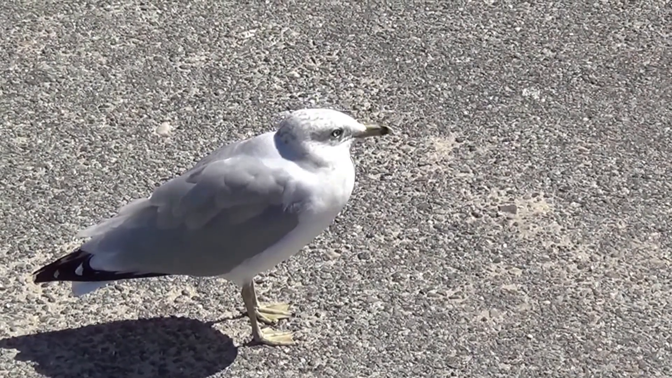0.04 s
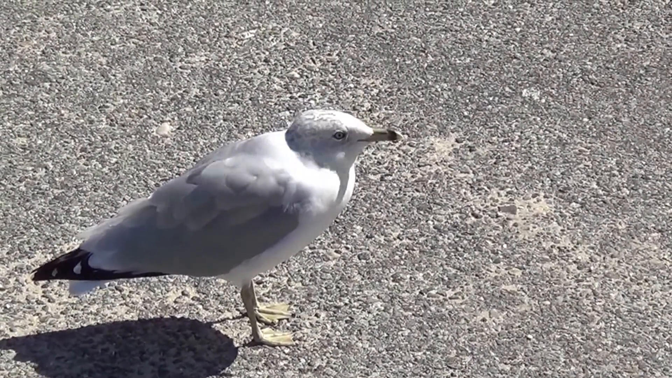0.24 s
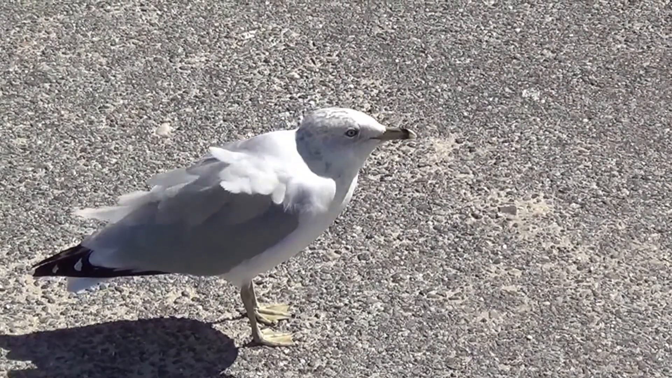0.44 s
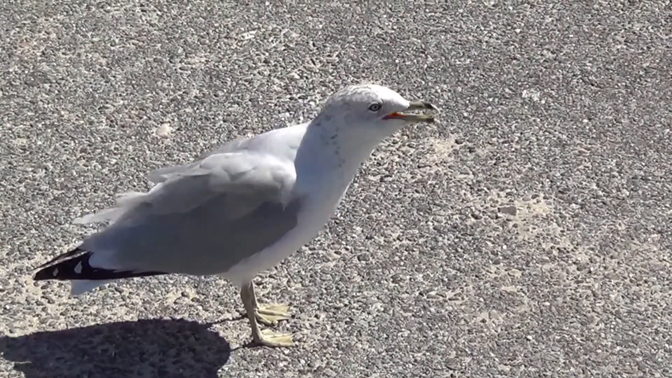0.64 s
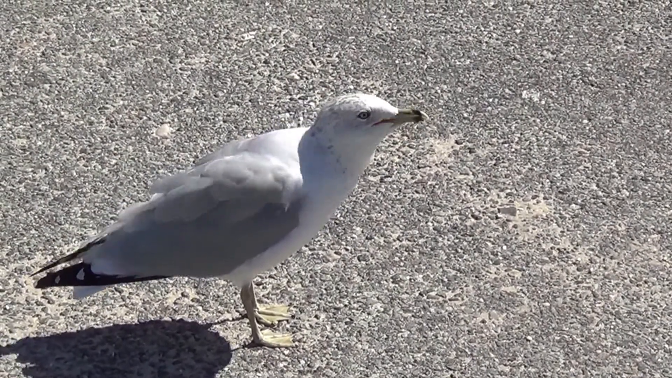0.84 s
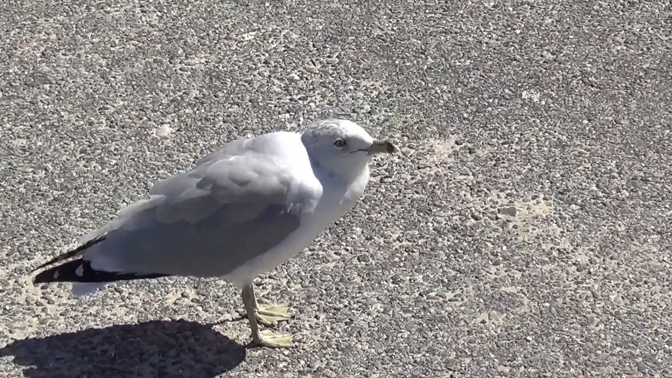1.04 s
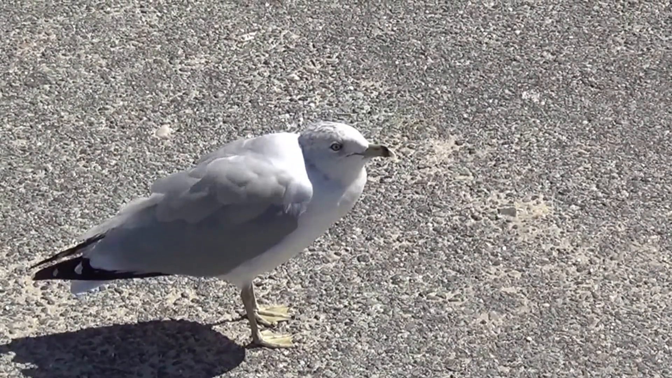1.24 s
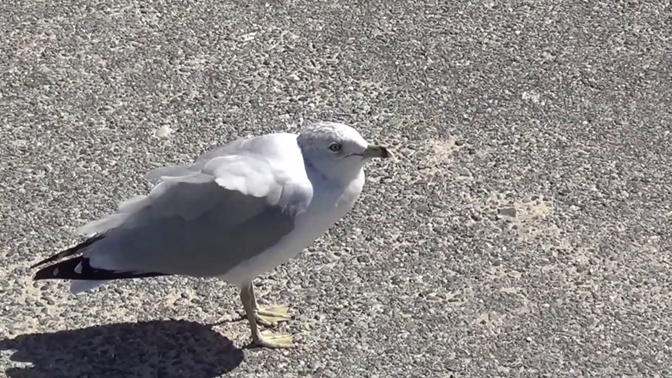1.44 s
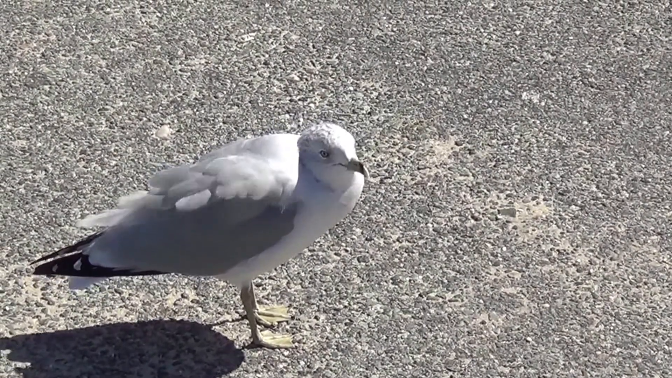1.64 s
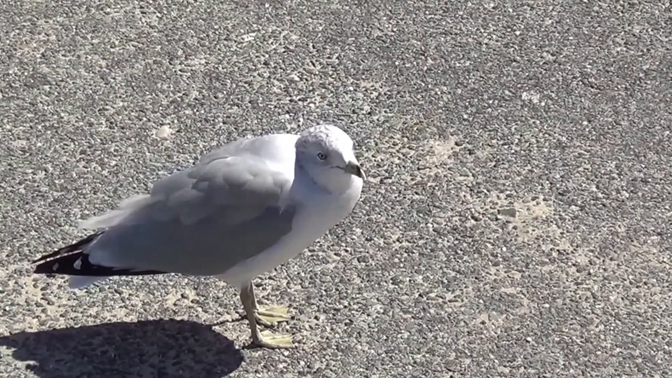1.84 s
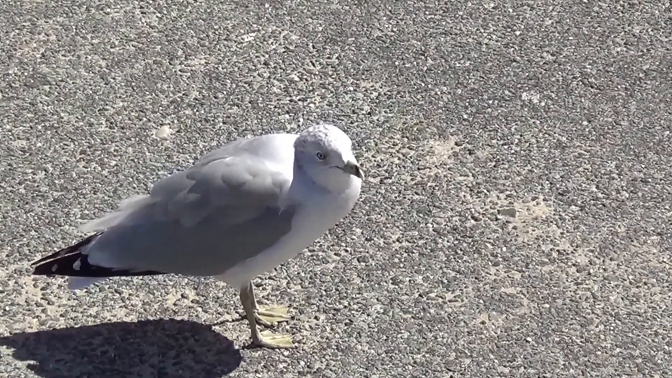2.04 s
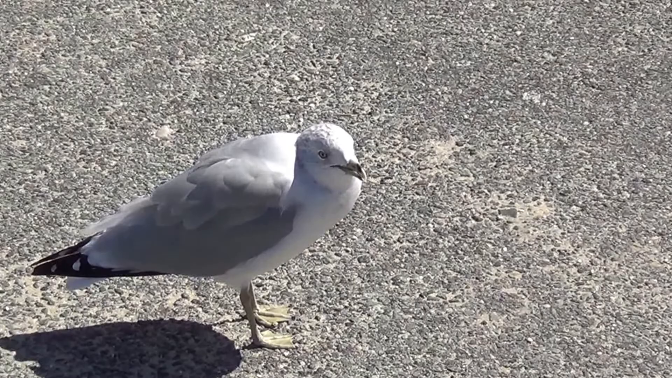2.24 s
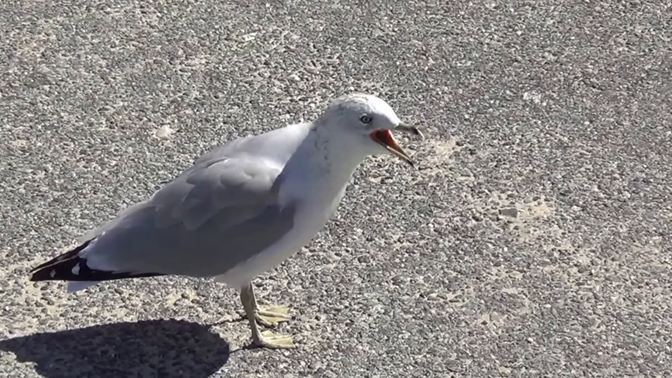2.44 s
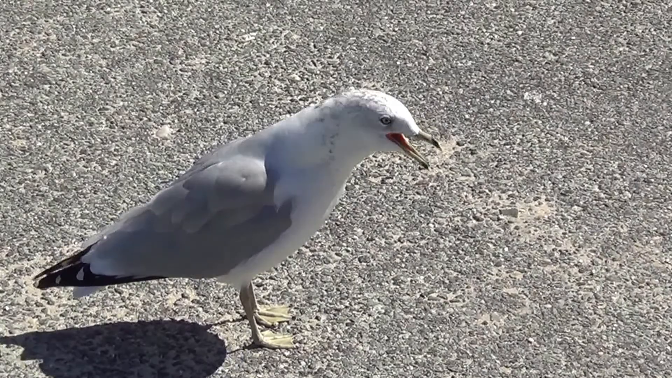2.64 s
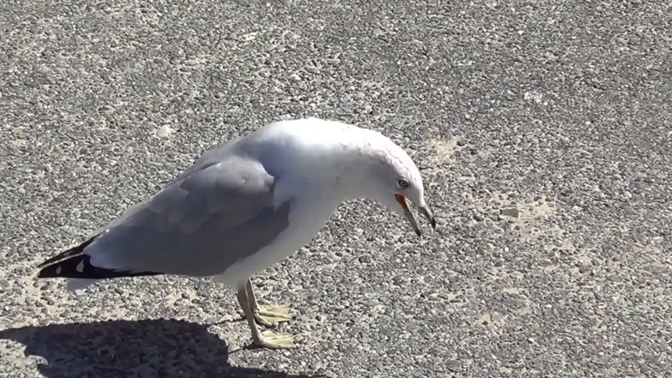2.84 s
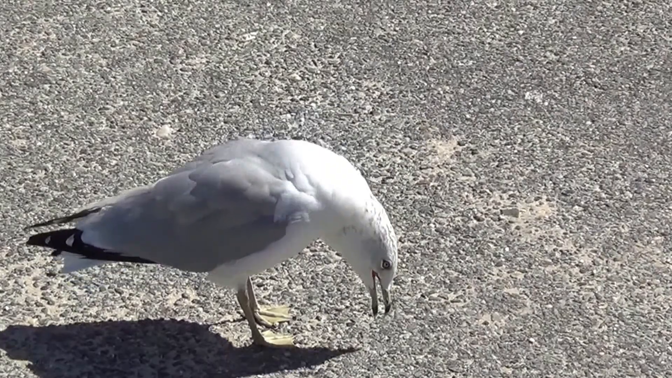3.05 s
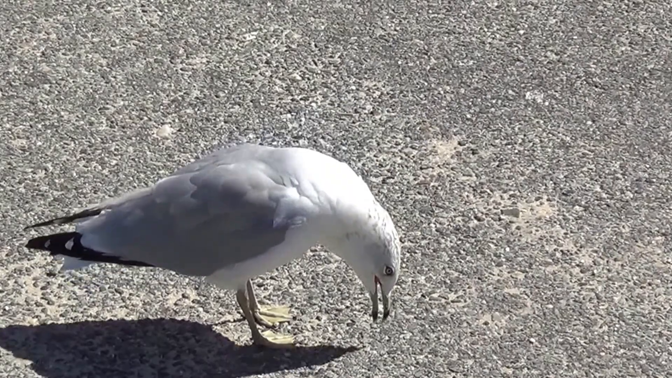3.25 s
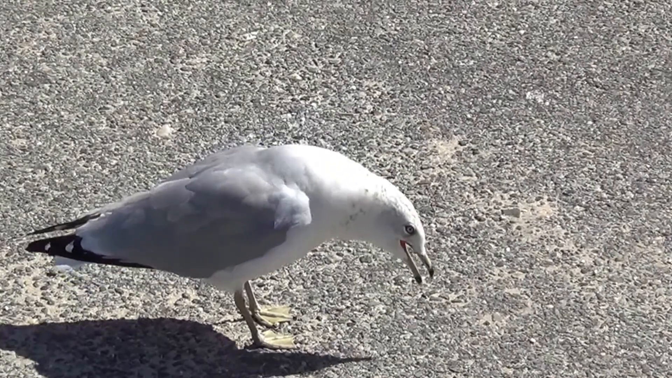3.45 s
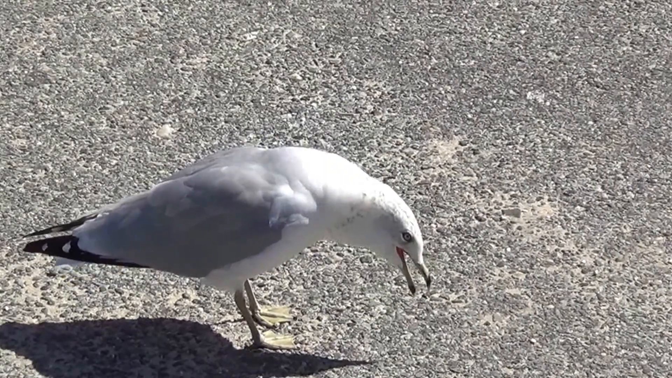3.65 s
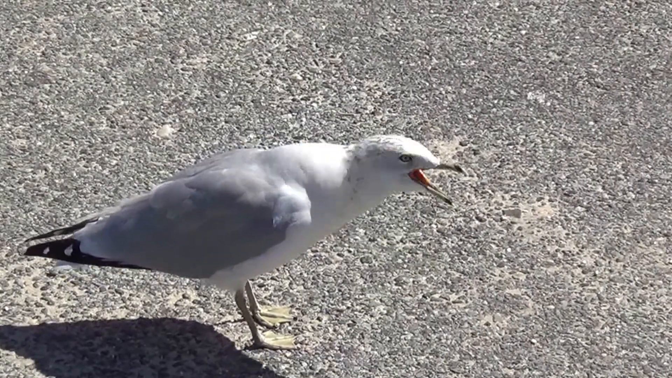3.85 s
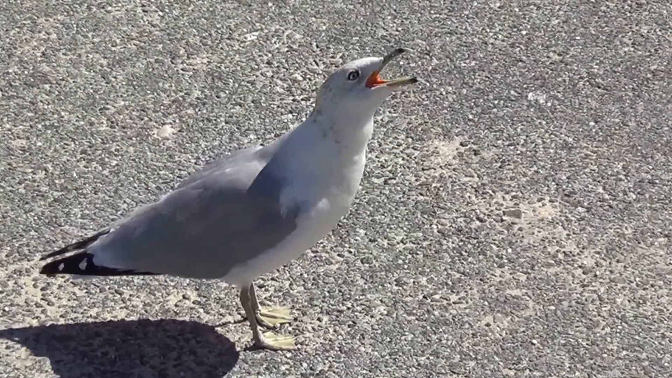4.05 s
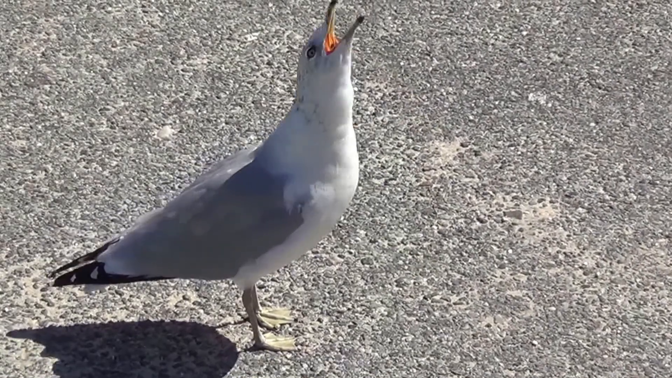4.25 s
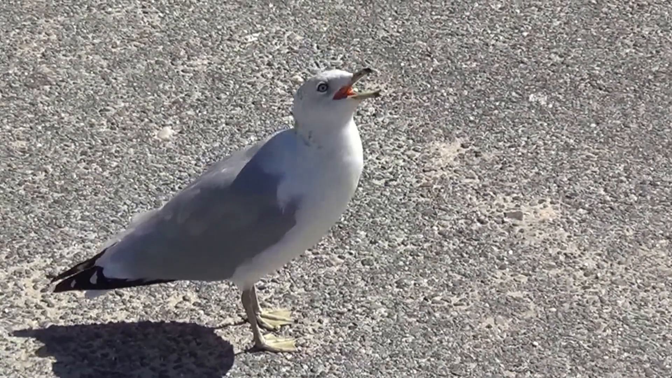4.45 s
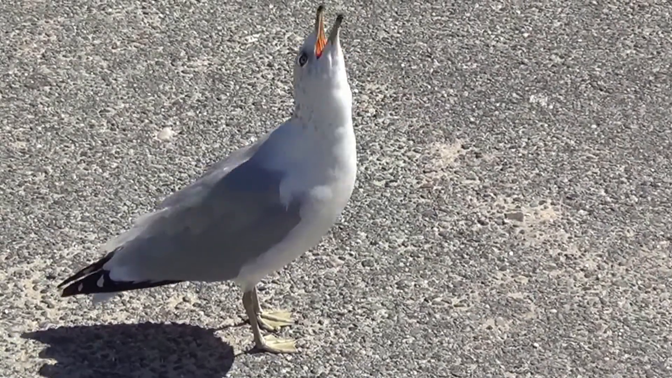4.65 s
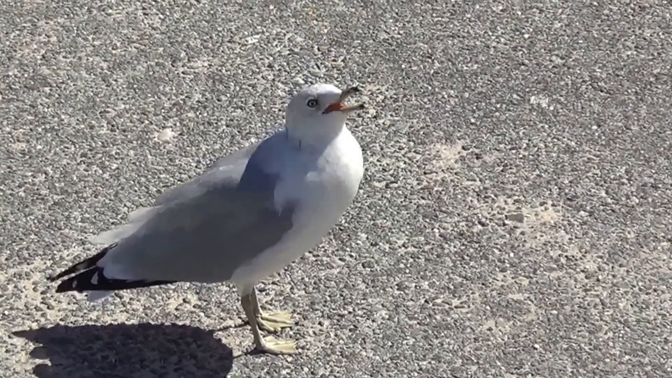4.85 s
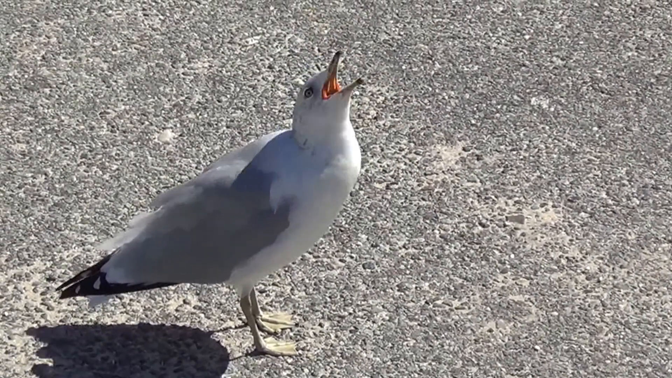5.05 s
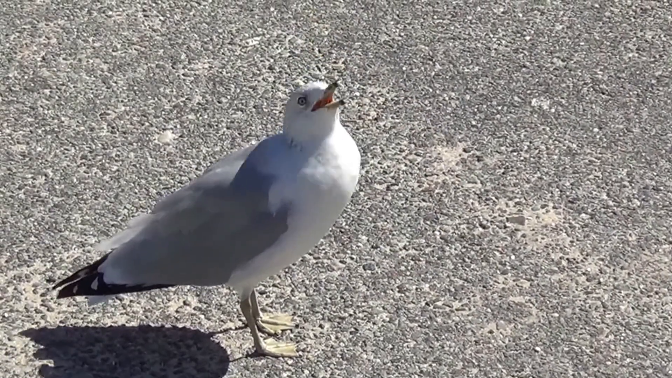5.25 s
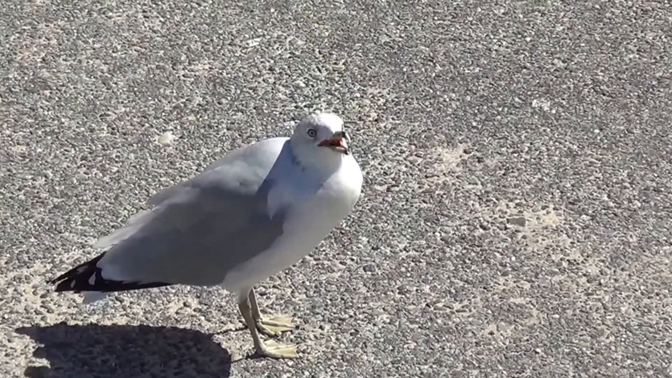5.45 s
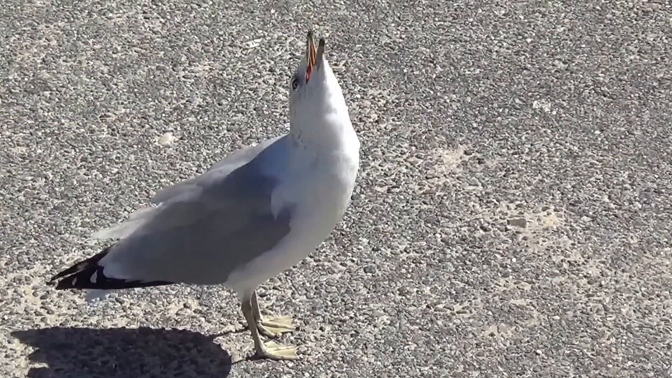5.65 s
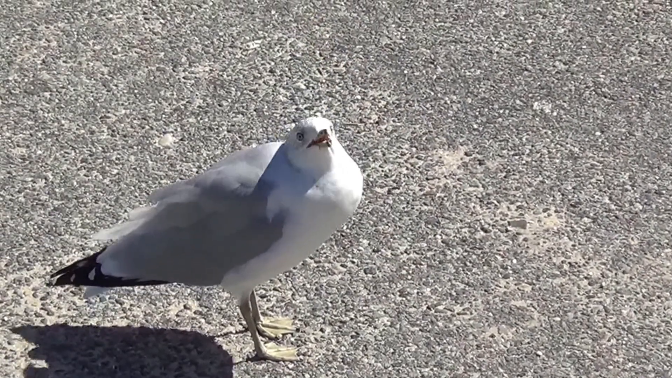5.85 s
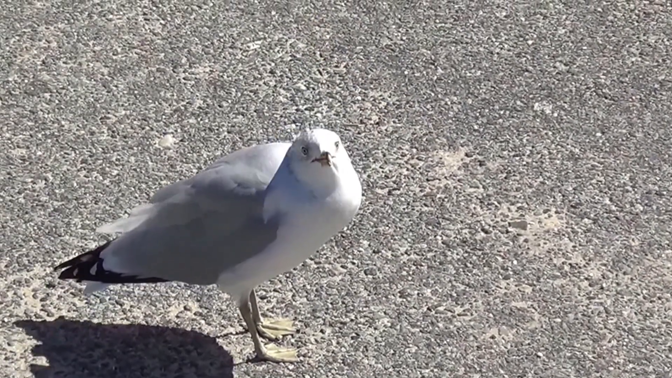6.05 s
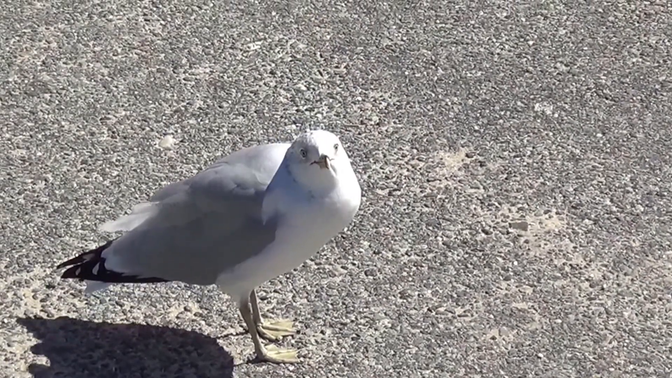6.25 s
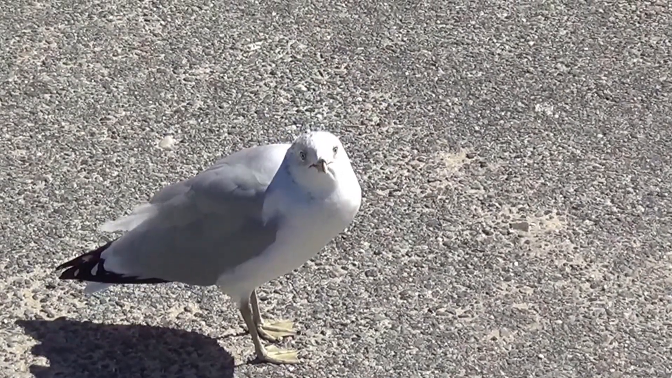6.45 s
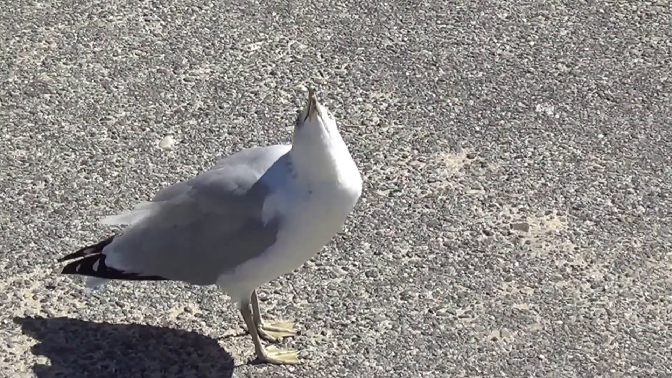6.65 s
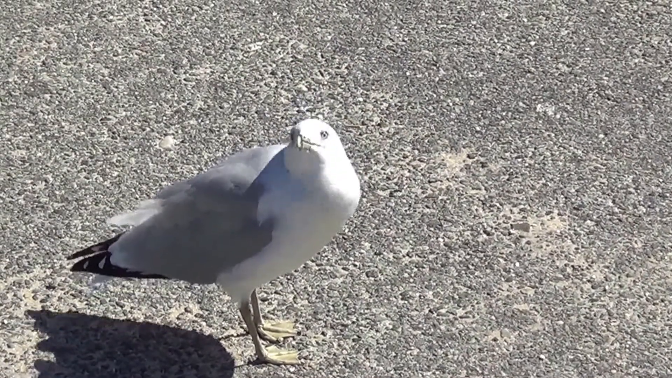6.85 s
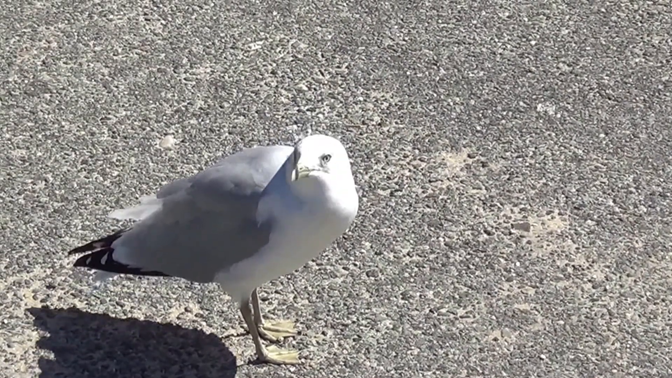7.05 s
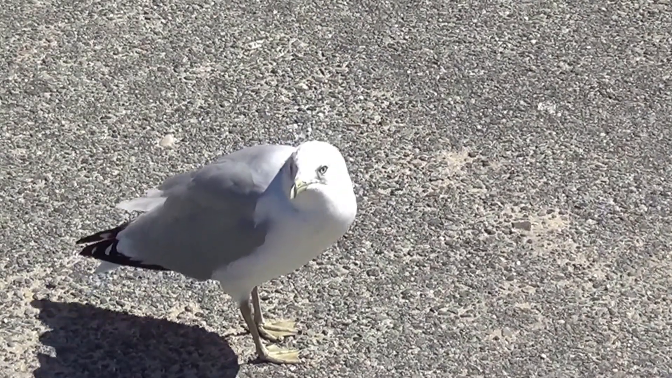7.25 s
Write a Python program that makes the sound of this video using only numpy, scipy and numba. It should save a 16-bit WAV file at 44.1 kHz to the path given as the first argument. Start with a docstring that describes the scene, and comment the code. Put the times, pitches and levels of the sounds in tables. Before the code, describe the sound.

Loud, harsh gull cries ring out up close, spaced at first and then in rapid succession, with soft wind touching the microphone.

```python
"""Gull on asphalt by the water

Ten loud cries on open asphalt, a metre or two from a stereo microphone pair. Each breaks in as a rasp,
a slow flutter throbbing the fast swing of the syrinx, locks into a clear tone that may jump in pitch or
double its period, and mostly breaks up again. Faint echoes follow. Behind the bird lie a distant outdoor
rush and one soft, low hum; puffs of wind touch the microphones."""
import sys
import numpy as np
from scipy import signal
from scipy.fft import rfft, irfft, next_fast_len
from scipy.io import wavfile
from scipy.ndimage import uniform_filter1d, minimum_filter1d, map_coordinates
from numba import njit

SR = 44100
rng = np.random.default_rng(int(sys.argv[2]) if len(sys.argv) > 2 else 0)


def wav_out(sig):
    """Save sig, one row per channel (or a flat mono array), as 16-bit PCM at SR to the path in sys.argv[1]."""
    wavfile.write(sys.argv[1], SR, np.round(np.clip(np.atleast_2d(sig).T, -1, 1) * 32767).astype(np.int16))


N = 322371

# colour of the distant rush: frequency_hz, gain_db
RUSH_COLOUR = [(25, -23), (45, -6), (85, 0), (170, -2.5), (330, -2.5), (1000, -6.5), (1700, -14.5),
               (3000, -17.5), (7000, -23.5), (15500, -25.5)]
# puffs of wind on the microphones: peak_s, level_db, half_width_s
WIND_PUFFS = [(0.042, -34, 0.025), (0.1, -44.5, 0.13), (1.074, -43, 0.023), (1.751, -56, .2),
              (2.027, -51.5, 0.045), (2.32, -52.5, 0.1), (2.628, -52.5, .03), (5.999, -55, 0.027),
              (7.25, -54.5, .03)]
# colour of the wind: frequency_hz, gain_db
WIND_COLOUR = [(25, -21.5), (70, -3), (170, 0), (330, -7), (700, -27.5), (3000, -46)]

# The gull's levels are set before the gain that gull() gives each layer.
# thin squeaks ahead of the first two cries, one list each: time_s, pitch_hz, second_harmonic_db
SQUEAK_CURVES = [
    [(.04, 4120, -54), (.065, 3800, -47), (.1, 3600, -60)],
    [(.1, 4350, -50), (.16, 4450, -66), (.22, 4950, -59), (.29, 4830, -65.5)],
    [(2.275, 4100, -60.5), (2.305, 3830, -44), (2.35, 3560, -62)],
]
# the croak that opens each cry:
# start_s, length_s, first_flutter_hz, last_flutter_hz, disorder (0-1), throat_hz, throat_db, beak_db
OPENING_CROAKS = [ (0.579, .026, 489.3, 600.5, .15, 1800, -15.5, -28.5),
                  (2.373, .021, 458, 540.4, .16, 1750, -22.5, -30),
                  (3.038, .027, 398.8, 425, .15, 1900, -21, -28),
                  (3.568, .034, 406, 452.7, .12, 2320, -17.5, -25.5),
                  (3.918, .073, 356.8, 375, .035, 1720, -12, -22.5),
                  (4.249, .128, 363.6, 397, .045, 1970, -11.5, -22),
                  (4.645, 0.067, 426, 370.6, .06, 2000, -11.5, -22),
                  (5.073, 0.057, 474.7, 394, .05, 2150, -13.5, -19),
                  (5.591, .014, 412, 427, .2, 2200, -18, -34.5),
                  (6.609, .028, 389.6, 500, .2, 2000, -25.5, -37), ]
# broad colour of the rasp from the throat: frequency_hz, gain_db
THROAT_COLOUR = [(100, -52.5), (350, -17.5), (800, -32.5), (1120, 1.5), (1450, 3), (2800, -0.5), (3300, -6),
                 (5000, -46.5)]
# broad colour of the rasp from the open beak: frequency_hz, gain_db
BEAK_COLOUR = [(300, -64), (2400, -21.5), (3300, -2), (3900, -0.5), (4900, -3), (5900, -4.5), (7200, -10),
               (10500, -10.5), (14000, -18.5), (16000, -25.5)]
# beak resonances, which move with the throat's and rise with gape: throat_multiple, width_hz, gain_db
BEAK_MODES = [(2.2, 744, -1), (4.4, 1600, -7)]
# colour of the knock of air as the throat opens: frequency_hz, gain_db
KNOCK_COLOUR = [(150, -27.5), (350, -3), (600, -2), (900, 8), (1500, -22.5), (4000, -45)]
# spells of faster flutter within a cry; columns as for the croaks
SQUEAL_SPELLS = [ (.612, .035, 1204, 1115, 0.068, 2000, -22.5, -25),
                 (2.402, .055, 987.5, 915, 0.067, 2364, -19, -21),
                 (2.464, 0.028, 525.3, 522, 0.034, 1782, -16.5, -18),
                 (3.141, 0.0074, 712, 715, 0.082, 2176, -28.5, -40.5),
                 (3.674, .005, 705, 705, 0.078, 2400, -30.5, -37.5),
                 (4.381, .01, 663, 645, .03, 2350, -23, -26.5),
                 (4.411, .003, 631, 627, .08, 2193, -14.5, -23.5),
                 (4.785, 0.034, 684.5, 672, 0.024, 2546, -23, -28.5),
                 (5.607, 0.051, 941.4, 839, 0.06, 2474, -18.5, -21.5),
                 (5.666, .016, 760, 750, 0.023, 1530, -12.5, -25.5),
                 (5.695, .008, 494, 500, 0.03, 1683, -16, -28.5),
                 (6.643, .043, 1000, 922.6, .045, 2686, -18.5, -20),
                 (6.7, .008, 810, 777, 0.021, 1660, -14.5, -26),
                 (6.718, 0.0052, 496, 508, 0.031, 1672, -23, -43), ]
# clear middle of each cry: shrill_db, then a list of time_s, pitch_hz, fundamental_db, second_harmonic_db
CRY_CURVES = [ (-35, [(0.62, 2266, -24.5, -20.5), (0.672, 2144, -27, -12), (0.734, 2110, -34.5, -13.5),
              (0.768, 1920, -29, -19), (0.88, 1802, -30, -44.5), (0.905, 1793, -29, -37)]),
              (-27.5, [(2.497, 2004, -17, -11), (2.539, 2055, -32, -9.5), (2.601, 2121, -18, -14),
              (2.647, 2007, -38, -14.5), (2.665, 1947, -25, -7.5), (2.702, 1708, -22, -42.5)]),
              (-27, [(3.068, 1913, -16, -11), (3.106, 2060, -24.5, -16.5), (3.142, 2155, -15.5, -28)]),
              (-28.5, [(3.6, 1870, -19, -14), (3.636, 2022, -21, -16.5), (3.673, 2148, -25.5, -22.5)]),
              (-28, [(3.99, 1842, -18.5, -23.5), (4.02, 1850, -39.5, -22.5), (4.058, 1917, -11.5, -16),
              (4.09, 1848, -22, -15), (4.118, 1772, -17, -19.5)]), (-24.5, [(4.41, 1850, -7.5, -24),
              (4.46, 1828, -12.5, -15.5), (4.474, 1760, -31, -19.5)]), (-32.5, [(4.71, 1846, -9.5, -31),
              (4.772, 2029, -15, -21.5), (4.804, 2065, -30, -49), (4.816, 1875, -16.5, -26),
              (4.862, 1897, -15, -9.5), (4.886, 1898, -34.5, -19)]), (-30.5, [(5.136, 1876, -13, -21.5),
              (5.168, 1967, -14, -34.5), (5.212, 2021, -8.5, -13.5), (5.254, 1970, -14.5, -29.5),
              (5.274, 1942, -12.5, -19), (5.332, 1988, -21.5, -20.5)]), (-29.5, [(5.694, 1952, -7.5, -36),
              (5.776, 2052, -21, -18), (5.844, 2024, -15, -18.5), (5.857, 2007, -26, -21)]),
              (-20.5, [(6.718, 1974, -21.5, -35), (6.764, 2004, -16.5, -37), (6.862, 2169, -34, -25),
              (6.936, 2079, -28.5, -31), (6.955, 2000, -37.5, -45)]), ]
# weight of harmonics 4 to 8: frequency_hz, gain_db
OVERTONE_COLOUR = [(7000, 3.5), (8200, 1.5), (10000, -2.5), (12000, -0.5), (14500, -12), (16000, -23.5)]
# period doubling, where alternate cycles differ: start_s, end_s, half_pitch_db
DOUBLING_SPELLS = [(.62, 0.659, -29), (0.776, 0.906, -42.5), (2.707, 2.705, -23.5), (3.065, 3.07, -20.5),
                   (3.597, 3.601, -25.5), (4.094, 4.119, -30), (4.422, 4.514, -27.5), (4.829, 4.91, -26.5),
                   (5.277, 5.372, -31.5), (5.69, 5.703, -28.5), (5.792, 5.866, -29)]
# lines that period doubling adds: pitch_multiple, gain_db
DOUBLING_LINES = [(1 / 2, -13), (3 / 2, -3), (5 / 2, 0), (7 / 2, -14), (9 / 2, -21), (11 / 2, -23)]
# the break that ends a cry: start_s, length_s, flutter_hz, throat_hz, throat_db, beak_db
CLOSING_BREAKS = [ (0.884, .066, 400, 1260, -26, -40), (2.685, .042, 394.4, 1700, -22.5, -39),
                  (3.324, 0.055, 413, 1800, -21, -35.5), (3.83, 0.068, 398, 1806, -22.5, -34),
                  (4.108, .039, 387.5, 1700, -11.5, -23.5), (4.467, 0.027, 412.2, 1610, -11.5, -19.5),
                  (4.873, .035, 399.6, 1610, -13.5, -21), (5.322, 0.0353, 506.6, 1560, -14, -22),
                  (5.849, 0.039, 505, 1640, -15, -22.5), ]
# notes in the high register, one list each: time_s, pitch_hz, level_db
HIGH_NOTE_CURVES = [
    [(3.144, 2990, -21.5), (3.166, 2962, -20.5), (3.302, 2942, -15.5), (3.335, 2795, -23)],
    [(3.676, 2961, -14.5), (3.786, 2909, -11.5), (3.826, 2814, -12), (3.838, 2670, -10.5)],
]

# level across the microphone pair: frequency_hz, left_minus_right_db
MIC_BALANCE = [(500, -4.5), (2000, -0.8), (4500, -1.5), (9000, 0.66)]
# phase across the microphone pair: frequency_hz, left_lead_rad
MIC_PHASE = [(1000, .3), (2000, .17), (4400, .17), (8000, .14), (12000, 0)]

TOP_HZ, DOUBLING_FLOOR_DB = 15900, -78
TIME = np.arange(N) / SR


def undb(db):
    return 10 ** (np.asarray(db) / 20)


def unit(x):
    """Scale to rms 1."""
    return x / np.sqrt(np.mean(x ** 2))


def lookup(points, hz):
    """Read (Hz, value) points on a log-frequency axis."""
    at, value = np.transpose(points)
    return np.interp(np.log(np.maximum(hz, 1)), np.log(at), value)


def colour(x, points):
    """Causal filter with the given (Hz, dB) response."""
    size = next_fast_len(len(x) + 2048, True)
    cepstrum = irfft(np.log(undb(lookup(points, np.fft.rfftfreq(size, 1 / SR)))), size)
    cepstrum[1:size // 2] *= 2
    cepstrum[size // 2 + 1:] = 0
    return irfft(rfft(x, size) * np.exp(rfft(cepstrum)), size)[:len(x)]


@njit
def resonance(x, hz, width):
    """Band-pass whose centre moves, gain 1 at the centre."""
    y, b, l = np.empty(len(x)), 0., 0.
    for i in range(len(x)):
        g, k = np.tan(np.pi * hz[i] / SR), width / hz[i]
        v = (b + g * (x[i] - l)) / (1 + g * (g + k))
        b, l, y[i] = 2 * v - b, l + 2 * g * v, k * v
    return y


def wander(size, rate):
    """Smooth chance that changes about rate times a second; spread near 1."""
    steps = np.arange(size) * rate / SR
    return map_coordinates(rng.standard_normal(size // 10 + 2), [steps], order=1, mode="wrap")


def steady(x):
    """Keep the rms at 1 over a few flutter cycles."""
    power = uniform_filter1d(uniform_filter1d(x ** 2, size=400), size=300)
    return x / np.sqrt(np.abs(power) + 1e-12)


def stretch(rows, edge_s):
    """Sample positions, soft on-off gate and control curves of one stretch of voice."""
    s, *columns = np.transpose(rows)
    at = np.flatnonzero((TIME > s[0] - edge_s) & (TIME < s[-1] + edge_s))
    inside = np.minimum(TIME[at] - s[0], s[-1] - TIME[at])
    gate = np.sin(np.pi / 4 * (1 + np.clip(inside / edge_s, -1, 1))) ** 2
    return at, gate, [np.interp(TIME[at], s, c) for c in columns]


def add(voice, sounds, db):
    """Mix (sample positions, sound) stretches into the voice."""
    for at, sound in sounds:
        voice[at] += undb(db) * sound


def stereo_noise(points, side_db):
    """Coloured noise, wide in the bass and narrow in the treble."""
    mid, side = (unit(colour(rng.standard_normal(N), points)) for _ in range(2))
    side = undb(side_db) * colour(side, [(2000, -0.5), (7000, 0.5), (12000, -17.0)])
    return np.array([mid + side, mid - side])


def distant_rush(level_db=-52.5):
    """The open air far behind the bird, gently swelling."""
    swell_db = .5 * wander(N, 4)
    return stereo_noise(RUSH_COLOUR, side_db=-6) * undb(level_db + swell_db)


def wind_on_microphones():
    """Short, low puffs of wind buffet the pair."""
    gusts = sum(undb(db) * np.exp(-((TIME - s) / width) ** 2) for s, db, width in WIND_PUFFS)
    return gusts * stereo_noise(WIND_COLOUR, side_db=-4)


def squeak(rows, slope_db=-11, waver=0.0051):
    """A soft, high whistle with two weak overtones."""
    at, gate, (hz, second_db) = stretch(rows, edge_s=.008)
    phase = 2 * np.pi * np.cumsum(hz * (1 + waver * wander(len(at), 200))) / SR
    whistle = sum(undb(second_db + slope_db * (k - 2)) * np.sin(k * phase) for k in range(1, 4))
    return at, np.sqrt(2) * gate * whistle


def rasp(rows, throb, air_db, treble_db, gape):
    """A slow flutter in the syrinx throbs and bends the fast swing, which locks to it and slips."""
    at, gate, (flutter_hz, disorder, throat_hz, throat_db, beak_db) = stretch(rows, edge_s=.003)
    size = len(at)
    drift = .2 * disorder * wander(size, 400) + .017 * wander(size, 90)
    slip = 19 * np.abs(disorder) ** 1.35 * wander(size, 1100)
    shimmer_db = 32 * disorder * wander(size, 900)
    bend = .8 + .55 * wander(size, 90)
    step = 2 * np.pi * flutter_hz * (1 + drift) / SR
    flutter = np.cumsum(step)
    multiple = np.maximum(1, np.round(throat_hz / flutter_hz))  # the one nearest the throat resonance
    # the bend leads or lags the throb by chance, so side lines come and go
    swing = np.cumsum(multiple * step) + bend * np.sin(flutter + wander(size, 60)) + slip
    wave = sum(undb(-5 * np.log2(k)) * np.cos(k * swing) for k in range(1, 8))
    air = .5 + undb(air_db) * rng.standard_normal(size)  # each throb pumps out a little hissing air
    source = np.exp(throb * np.cos(flutter)) * undb(shimmer_db) * (wave + air)
    throat = colour(resonance(source, throat_hz, width=700.) + undb(-5) * source, THROAT_COLOUR)
    rings = sum(undb(db) * resonance(source, gape * k * throat_hz, float(width))
                for k, width, db in BEAK_MODES)
    beak = colour(rings + undb(-6) * source, BEAK_COLOUR)
    beak = colour(beak, [(5200, 0.011), (7500, treble_db)])  # treble shelf
    # throat and beak each sputter a little
    throat = undb(throat_db + 2 * wander(size, 112)) * steady(throat)
    beak = undb(beak_db + 2 * wander(size, 112)) * steady(beak)
    return at, gate * (throat + beak)


def croak(start, length, first_hz, last_hz, disorder, throat_hz, throat_db, beak_db):
    """The opening rasp: the flutter starts wild, swells, settles and gives way."""
    attack_s, settle_s, release_s, edge_db = .02, .021, .013, -14
    onset_disorder, beak_fade_db_per_s = .2, 60
    t = np.linspace(0, length + release_s, 60)
    closed = np.clip(1 - t / attack_s, 0, 1)
    release_db = edge_db * np.clip((t - length) / release_s, 0, 1)
    rows = np.column_stack([start + t, np.interp(t, [0, length], [first_hz, last_hz]),
                            disorder + (onset_disorder - disorder) * np.exp(-t / settle_s),
                            throat_hz * .88 ** closed,  # the resonance rises into place
                            throat_db + edge_db * closed + release_db,
                            beak_db - 12.5 * closed + release_db - beak_fade_db_per_s * t])
    return rasp(rows, throb=0.99, air_db=-28, treble_db=1, gape=1.02)


def knocks(level_db=-40, delay_s=.021, half_width_s=.014):
    """A low knock of air as the throat opens for each cry."""
    puffs = sum(np.exp(-((TIME - start - delay_s) / half_width_s) ** 2) for start, *_ in OPENING_CROAKS)
    return undb(level_db) * puffs * unit(colour(rng.standard_normal(N), KNOCK_COLOUR))


def squeal(start, length, first_hz, last_hz, disorder, throat_hz, throat_db, beak_db):
    """The voice slips into a faster, gliding flutter; the throat resonance follows the glide."""
    attack_s, release_s, edge_db, throat_follow = .008, .016, -18.5, 2.1
    corners = [(start - attack_s, first_hz, edge_db), (start, first_hz, 0),
               (start + length, last_hz, 0), (start + length + release_s, last_hz, edge_db)]
    rows = [(s, hz, disorder, throat_hz * (hz / first_hz) ** throat_follow, throat_db + db, beak_db + db)
            for s, hz, db in corners]
    return rasp(rows, throb=0.62, air_db=-30, treble_db=-1, gape=1.01)


def clear_tone(rows, waver, shimmer_db, fade_db):
    """The syrinx swings regularly; when alternate cycles differ, lines appear between the harmonics."""
    at, gate, (hz, first_db, second_db, third_db, upper_db, half_db) = stretch(rows, edge_s=0.0024)
    size = len(at)
    hz = uniform_filter1d(hz, size=900, mode="nearest")  # muscles bend the pitch without corners
    # the swing is least steady just after it locks and just before it breaks
    from_edge_s = np.minimum(at - at[0], at[-1] - at) / SR
    unrest = waver + .0083 * np.exp(-from_edge_s / .015)
    jitter = undb(half_db + 2) * wander(size, 1400)  # doubled cycles are also uneven
    phase = 2 * np.pi * np.cumsum(hz * (1 + unrest * wander(size, 410))) / SR + jitter
    fading = lambda: fade_db * wander(size, 28)  # each overtone swells and fades on its own
    lines = [(1, first_db), (2, second_db), (3, third_db + fading())]
    lines += [(k, upper_db + lookup(OVERTONE_COLOUR, k * hz) - 9 + fading()) for k in range(4, 9)]
    lines += [(k, half_db + db) for k, db in DOUBLING_LINES]
    tone = sum(undb(db + shimmer_db * wander(size, 120)) * np.sin(k * phase) * (k * hz < TOP_HZ)
               for k, db in lines)
    return at, np.sqrt(2) * gate * tone


def doubling_db(s, fade_db_per_s=1100.5):
    """Level of the half-pitch lines, which fade in and out around each period doubling."""
    levels = [db - fade_db_per_s * np.abs(s - np.clip(s, start, end))
              for start, end, db in DOUBLING_SPELLS]
    return np.maximum(np.max(levels, axis=0), DOUBLING_FLOOR_DB)


def cry(shrill_db, curve, full_db=-12.5, overtone_follow=.4):
    """The clear middle of a cry: overtones grow with its level and are dull near either end."""
    corners_s, *columns = np.transpose(curve)
    s = np.linspace(corners_s[0], corners_s[-1], 100)
    hz, first_db, second_db = (np.interp(s, corners_s, c) for c in columns)
    level_db = 20 * np.log10(np.hypot(undb(first_db), undb(second_db)))
    from_edge_s = np.minimum(s - s[0], s[-1] - s)
    dull_db = -12 * np.exp(-from_edge_s / .016)
    upper_db = shrill_db + overtone_follow * (level_db - full_db) + dull_db
    rows = np.column_stack([s, hz, first_db, second_db, upper_db - 3.5, upper_db, doubling_db(s)])
    return clear_tone(rows, waver=0.0012, shimmer_db=3.1, fade_db=3.5)


def voice_break(start, length, flutter_hz, throat_hz, throat_db, beak_db):
    """The closing rasp: a short burst that sags and grows wilder as the pressure goes."""
    peak_share, edge_db, sag_octaves = .45, -19.5, .22
    share = np.array([0, peak_share, 1])
    swell_db = edge_db * np.array([1, 0, 1])
    sag = 2 ** (sag_octaves * (peak_share - share))
    disorder = np.interp(share, [0, 1], [.11, .16])
    rows = np.column_stack([start + length * share, flutter_hz * sag, disorder,
                            throat_hz * sag, throat_db + swell_db, beak_db + swell_db])
    return rasp(rows, throb=0.4, air_db=-31, treble_db=-6, gape=1.2)


def high_note(curve, second_db=-26, third_db=-37, upper_db=-26, full_db=-16):
    """Head down, the gull flips into a high register: a whistle that turns shrill as it gets louder."""
    rows = [(s, hz, db, second_db, third_db, upper_db + 2 * (db - full_db), DOUBLING_FLOOR_DB)
            for s, hz, db in curve]
    return clear_tone(rows, waver=.0005, shimmer_db=1.04, fade_db=2.0)


def drop(start, length_s=.031, from_hz=1915, to_hz=1570, first_db=-19.5, dull_db=-24.5):
    """A high note ends in a short slide in the low register: the pitch falls and the overtones die."""
    overtones_db = first_db + np.array([2, -26.5, -23.5])  # second, third, higher
    half_db = first_db - 14
    rows = [(start, from_hz, first_db, *overtones_db, half_db),
            (start + length_s, to_hz, first_db, *(overtones_db + dull_db), half_db)]
    return clear_tone(rows, waver=.004, shimmer_db=6.0, fade_db=11.5)


def gull():
    """The one bird, close up: all its calls mixed into a single voice."""
    voice = knocks()
    add(voice, [croak(*row) for row in OPENING_CROAKS], db=1.5)
    add(voice, [squeal(*row) for row in SQUEAL_SPELLS], db=0.4)
    add(voice, [cry(*row) for row in CRY_CURVES], db=1.5)
    add(voice, [high_note(curve) for curve in HIGH_NOTE_CURVES], db=-1)
    add(voice, [drop(start=curve[-1][0]) for curve in HIGH_NOTE_CURVES], db=-1.5)
    add(voice, [voice_break(*row) for row in CLOSING_BREAKS], db=1.5)
    add(voice, [squeak(curve) for curve in SQUEAK_CURVES], db=-3)
    return voice


def microphone_pair(voice):
    """The two microphones hear the bird with slightly different level and phase."""
    hz = np.fft.rfftfreq(N, 1 / SR)
    left = undb(lookup(MIC_BALANCE, hz) / 2) * np.exp(.5j * lookup(MIC_PHASE, hz))
    return irfft(rfft(voice) * np.array([left, 1 / left]), N)


def echoes(voice):
    """Quick scatter from the ground and things nearby, and a fainter, longer return from further off."""
    t = TIME[:SR]
    tail = lambda t60_s: unit(rng.standard_normal(SR) * undb(-60 * t / t60_s) * (t > .004))
    response = undb(-17) * tail(t60_s=.15) + undb(-32) * tail(t60_s=.65)
    wet = signal.fftconvolve(voice, response / np.sqrt(SR))[:N]
    return colour(wet, [(2000, 4.5), (4200, -1.5), (8000, -11)])  # duller than the direct sound


def hum(start_s=5.99, pitch_hz=116.8, level_db=-49.5, t60_s=.82):
    """A soft, low ring far in the background that starts with a bump and dies away."""
    t = np.maximum(TIME - start_s, 0)
    return np.sqrt(2) * undb(level_db - 60 * t / t60_s) * np.sin(2 * np.pi * pitch_hz * t)


def scene():
    """The gull close to the pair, with its echoes and the open air around it."""
    voice = gull()
    scatter = np.array([echoes(voice) for _ in range(2)])
    return microphone_pair(voice) + scatter + distant_rush() + wind_on_microphones() + hum()


def record(dry, ceiling=0.45):
    """A fast limiter holds down the sharpest peaks; the top is cut."""
    gain = np.minimum(1, ceiling / (np.abs(dry).max(axis=0) + 1e-9))
    gain = uniform_filter1d(minimum_filter1d(gain, size=45), size=45)
    return signal.sosfilt(signal.ellip(10, .2, 80, TOP_HZ, fs=SR, output="sos"), dry * gain)


dry = scene()
out = record(dry)
wav_out(out)
```